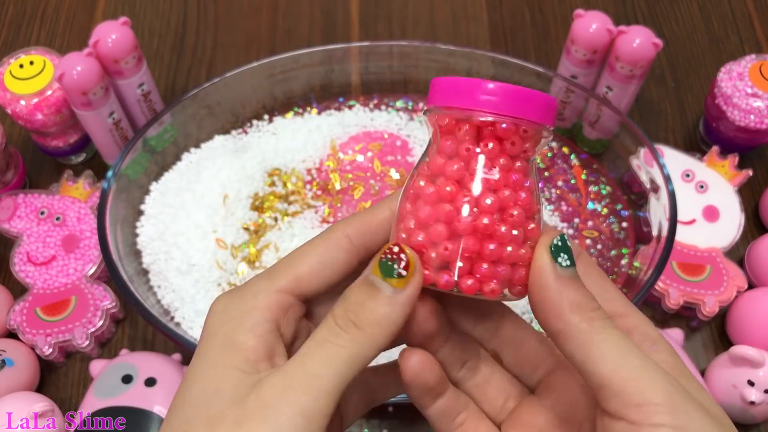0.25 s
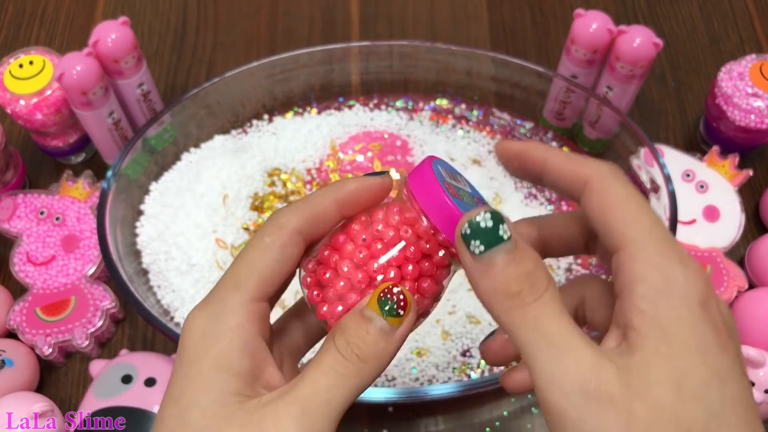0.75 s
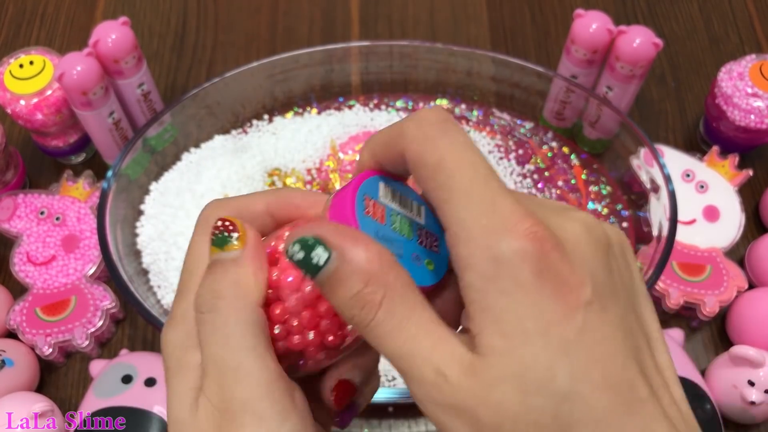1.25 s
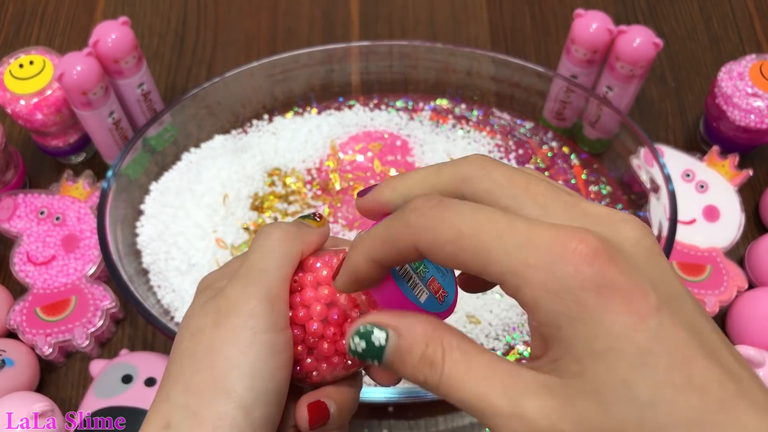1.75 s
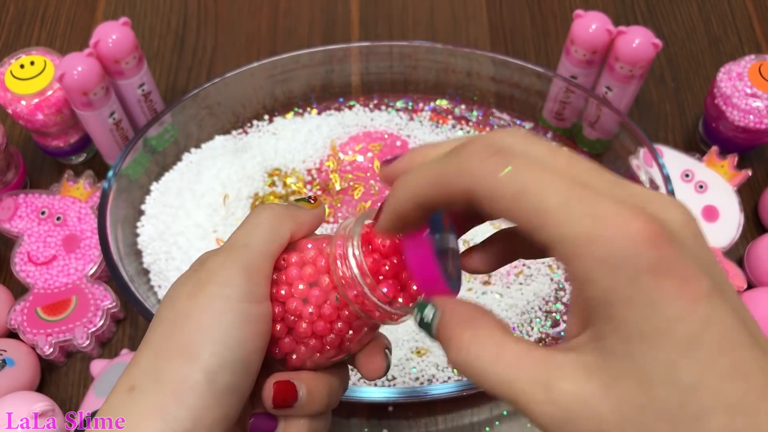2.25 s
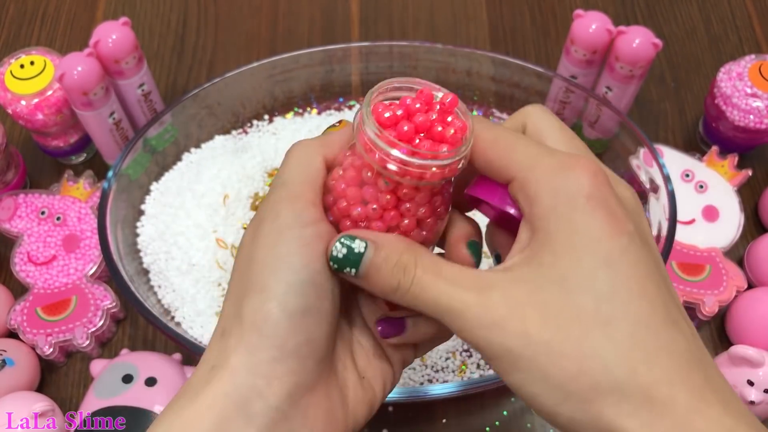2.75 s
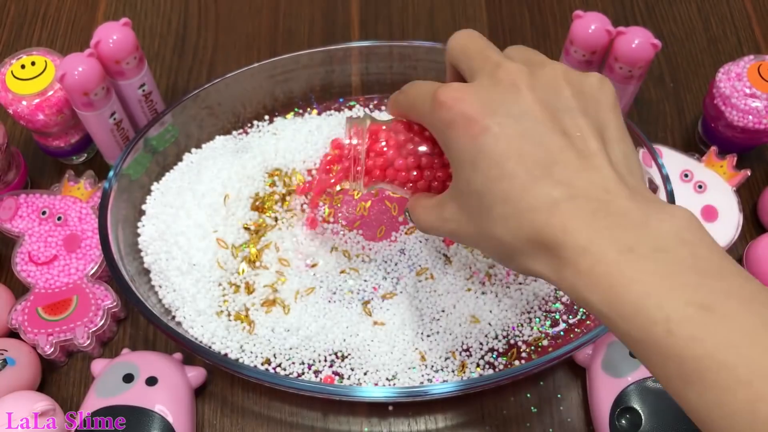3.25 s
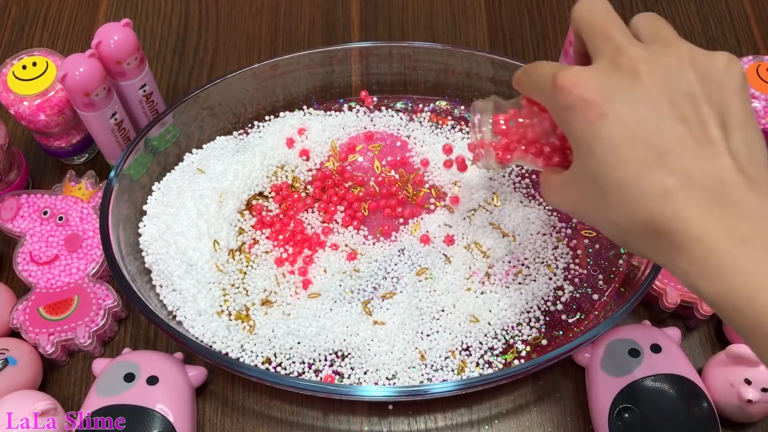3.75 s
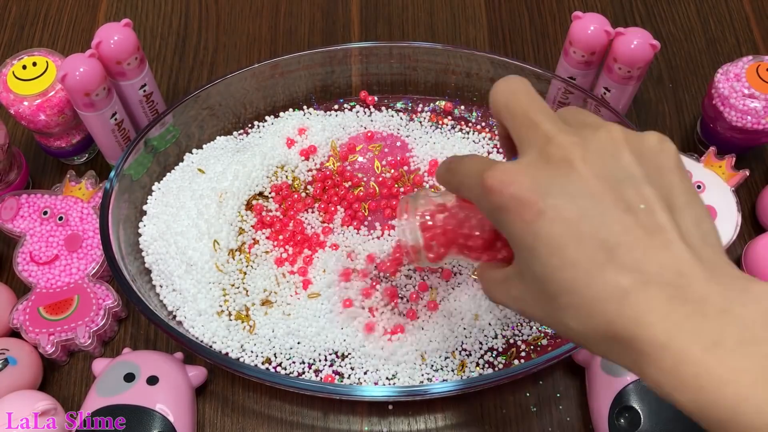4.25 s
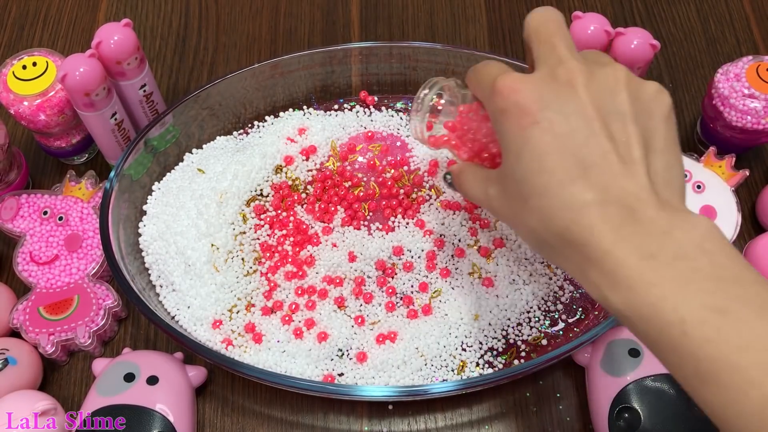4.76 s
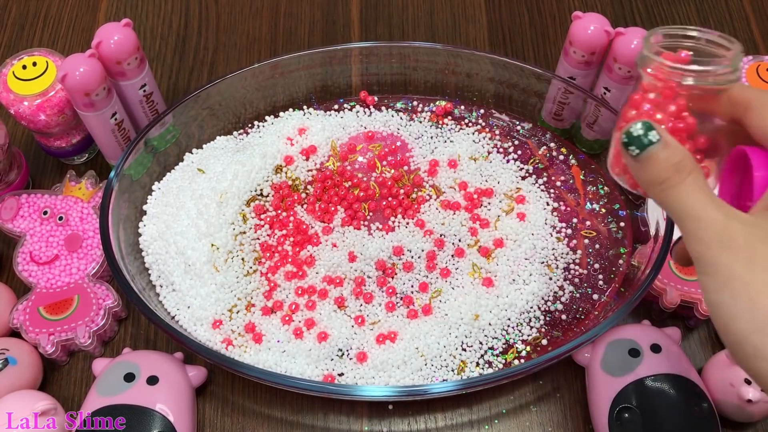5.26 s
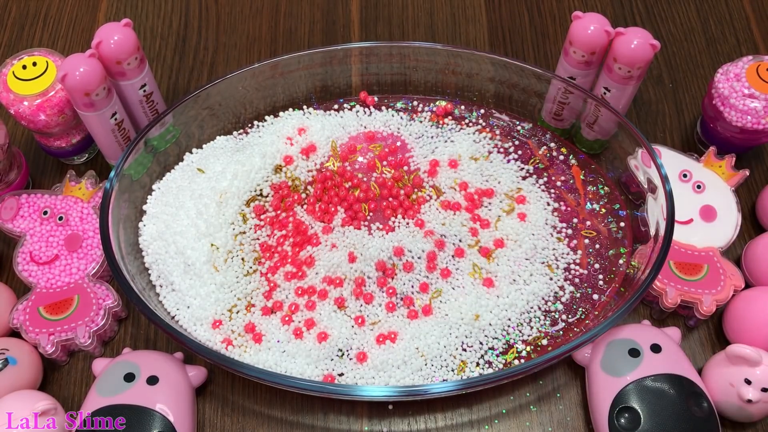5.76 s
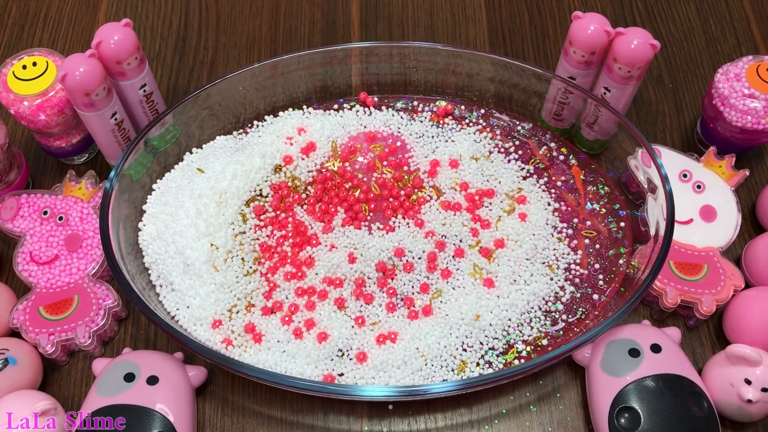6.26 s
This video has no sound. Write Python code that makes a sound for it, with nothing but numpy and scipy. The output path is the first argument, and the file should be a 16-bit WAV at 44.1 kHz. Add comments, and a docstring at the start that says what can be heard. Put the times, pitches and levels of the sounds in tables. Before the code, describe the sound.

Close, dry bead rattle in a hand-turned plastic jar, small lid clicks, a crisp ticking pour, a loud final clatter, then quiet hush.

```python
"""Hard beads rattle and slide in a small closed plastic jar turned by hand, close up in a quiet room.
The lid is unscrewed, beads pour into a glass bowl of foam balls, a few strays clink on the glass,
and the jar is stood up again so the rest tumbles back; twice the rattle stops short, the hush goes on.
Each bead knock is a click and a dying noise scatter through band-passes for wall, tick and air of the jar;
the lid is bursts of slip noise, the glass is decaying sines, hush and rumble are shaped noise."""
import sys
import numpy as np
from scipy import signal
from scipy.fft import rfft, irfft
from scipy.io import wavfile

SR = 44100
rng = np.random.default_rng(int(sys.argv[2]) if len(sys.argv) > 2 else 0)


def output_pcm(signal):
    """Save a mono or channel-first signal as 16-bit PCM at the path in sys.argv[1].

    Samples are clipped to [-1, 1] before scaling.
    """
    pcm = np.clip(np.atleast_2d(signal).T, -1, 1) * 32767
    wavfile.write(sys.argv[1], SR, np.round(pcm).astype(np.int16))


N = 287091
T = np.arange(N) / SR

# Room and microphone noise spectrum: f/Hz, relative density/dB
HUSH_SPECTRUM = [(20, -38), (35, -16.5), (55, -2), (82, -9.5), (200, -11), (500, -16.5), (900, -21),
                 (1200, -20), (5350, -31.5), (11600, -34), (14200, -32.5), (16000, -36.5)]
HUSH_DB = -65.5  # rms
# Soft low rumble that comes and goes: start/s, end/s, f/Hz, width/Hz, rms level/dB
RUMBLES = [(3.31, 5.063, 200, 300, -64.5), (5.445, 5.866, 170.3, 50, -71.5)]
ROOM_T60_S, ROOM_DB, ROOM_DULL_HZ = .55, -15.5, 8000  # decay, tail energy, treble roll-off

# Stray beads on the glass: t/s, strike level/dB, hardness/(dB per octave) that lifts the upper modes
GLASS_STRIKES = [(2.559, -44.5, 1.5), (2.6812, -48, 2), (2.7854, -53, 6)]
# Ringing modes of the glass: f/Hz, level/dB, t60/s
GLASS_MODES = [(1300, -5, 0.14), (2196, -5.5, 0.051), (3030, -11, 0.093), (5370, -19, .09),
               (6826, -21, 0.099), (8200, -17, 0.053)]

# Lid jerks along its thread and finger thumps on the jar:
# t/s, level at 620 Hz/dB, decay time/s, sharpness/(dB per octave)
LID_JERKS = [(1.515, -61, 0.074, 2), (1.614, -53.5, 0.022, 2.5), (1.639, -55, 0.031, -5),
             (1.969, -44, 0.0053, 2), (2.063, -53, 0.029, -0.5), (2.114, -56, 0.015, 6),
             (2.15, -58.5, 0.022, 5), (2.201, -47.5, 0.011, -0.5), (2.218, -50, .006, 4),
             (2.562, -57, 0.018, 0.5), (2.991, -52, 0.0077, 4)]
# Resonances of the lid and the hand-damped jar: f/Hz, width/Hz, level/dB
LID_MODES = [(341, 120, -2), (648, 275, 0), (1140, 590, 3.5), (2970, 480, -5.5)]

# Starts of the open-jar poses; before the first one the lid is on
LID_OFF_S, POURING_S, HALF_EMPTY_S, UPRIGHT_S, SETTLING_S = 2.48, 3.6, 4.1, 5.062, 5.4
POSES_S = [LID_OFF_S, POURING_S, HALF_EMPTY_S, UPRIGHT_S, SETTLING_S]
END_S = 5.861  # the last rattle stops short here

# Bead resonances: f/Hz, width/Hz, then relative level/dB in each of the six poses:
# lid on, tipping, pouring, half empty, upright, settling
# The plastic wall
WALL_MODES = [(3260, 500, 2.5, -9, -9, -12, -10.5, -5), (4020, 520, -1, -1, 0.5, -11, -1.5, 0),
              (4527, 220, -7.5, -8.5, 2.5, 0.5, -3, -1.5), (5044, 790, -0.5, -4, -3.5, 0, -7.5, -4),
              (6480, 1150, 0.5, -0.5, 3.5, 3.5, 0, -0.5)]
# The bright tick, same columns
TICK_MODES = [(7830, 1100, -1.5, -4, -5, -5.5, 4.5, 2.5), (9180, 590, 2, 0, 2, 0.5, -2, -2.5),
              (10060, 1200, 0, -2, -1.5, -0.5, -6.5, -14), (13470, 2000, -3.5, -5.5, -6, -6, -4.5, -15),
              (15570, 1800, 1.5, -3.5, -1.5, -1, -6.5, -6)]
# The air in the jar, same columns
AIR_MODES = [(810, 400, -30, -17, -17, -18.5, -37, -42.5), (1177.5, 140, -12, -4, -7.5, -1, -5, -14.5),
             (1363, 140, -10.5, -8, -10.5, -10, -2.5, 1), (1758, 460, -1, -2, -5.5, 1, 1, -4),
             (2127, 260, -7, -2, 0, -2, -2, -8), (2505, 690, 2.5, 0.5, -11, -9, -5, 2)]

# Single loud knocks: t/s, nominal wall peak level/dB, tick above wall/dB
LOUD_KNOCKS = [(0.0698, -34, 0.5), (0.084, -28.5, -6), (0.1389, -29.5, -13), (0.1593, -39, -4),
               (0.1778, -17, -13), (0.2274, -32, -9), (0.252, -30, -16), (0.2674, -36, -8),
               (0.439, -40.5, -8), (0.4627, -37.5, -7), (0.4775, -31, -21), (0.4977, -31.5, -15),
               (0.5315, -33, -23), (0.6018, -38, -6), (0.645, -30, 3), (0.6702, -27, 7), (0.7096, -34, -10),
               (0.7263, -35, 4.5), (0.7718, -25.5, -3), (0.786, -33, -5), (0.8345, -30.5, -2),
               (0.8494, -19.5, -5), (0.866, -27.5, -15), (0.8765, -35.5, 16), (0.9324, -27.5, -19),
               (0.9396, -27, -22), (0.967, -21, -9), (1.131, -33, -29), (1.217, -33.5, 0.5),
               (1.2985, -35, -18), (1.352, -48, 11), (1.5612, -42, -10), (1.6816, -25.5, 0.5),
               (1.6904, -27.5, -0.5), (1.9254, -35, -4), (1.971, -38, 8.5), (2.1154, -38, 4.5),
               (2.2491, -40.5, 17), (2.2591, -30.5, 6), (2.2829, -25, -5), (2.301, -28.5, -8),
               (2.3196, -25.5, -7), (2.3556, -35, 2), (2.38, -27.5, -0.5), (2.5566, -38.5, 12),
               (2.613, -41, 4), (2.6808, -40, 5), (2.7073, -36, 11.5), (2.73, -44, 11), (2.7767, -41.5, 2),
               (2.8244, -28, -9), (2.871, -33.5, 3), (2.8936, -34.5, 6), (2.9273, -28, 3),
               (2.9947, -29, -9), (3.009, -30.5, -1), (3.0282, -35.5, 10), (3.0403, -31, 3),
               (3.0864, -30.5, -3), (3.1508, -28.5, 6.5), (3.177, -32, 2.5), (3.2082, -26.5, 9),
               (3.223, -28, 9), (3.239, -22, 7), (3.2905, -28, 7), (3.3343, -25.5, 9), (3.5578, -23, 6.5),
               (3.668, -21.5, 9), (3.7254, -22.5, 9), (3.7499, -18.5, 8), (3.7753, -19, 5),
               (3.8046, -22, 9.5), (3.859, -22.5, 10.5), (3.9542, -21, 8.5), (4.0038, -25.5, 11),
               (4.0401, -22, 9.5), (4.0543, -23, 11), (4.1222, -22.5, 6), (4.1382, -17, 1.5),
               (4.1824, -15.5, 2), (4.2792, -22.5, 8), (4.445, -25, 10), (4.5615, -28, 8), (4.5988, -27, 3),
               (4.621, -28.5, 12), (4.6534, -39, 12.5), (4.703, -26, 10), (4.7105, -22.5, 1),
               (4.7322, -24.5, 10.5), (4.748, -30.5, 17.5), (4.7878, -27, 13.5), (4.8079, -19.5, -2.5),
               (4.8408, -25, -1), (4.861, -24.5, 2.5), (4.8944, -27.5, 8.5), (4.956, -44.5, 13.5),
               (4.9854, -50, 8), (5.1134, -45, -13), (5.139, -38.5, -1.5), (5.172, -41.5, -5),
               (5.1904, -29.5, -10), (5.224, -28, -8), (5.2432, -24.5, -8.5), (5.257, -21, -6.5),
               (5.2867, -29, -3), (5.3231, -12, -9), (5.3336, -7.5, -5), (5.3476, -13, 2.5),
               (5.3581, -14, -1.5), (5.3933, -17.5, -1), (5.4322, -11, -3.5), (5.4963, -13.5, -5),
               (5.5222, -18.5, -12), (5.5608, -21, -8), (5.5914, -21, -13), (5.625, -33.5, -14.5),
               (5.6875, -20, -4.5), (5.7343, -16.5, -1.5), (5.7526, -18.5, 0.5), (5.7738, -24, -4),
               (5.827, -30.5, -14)]
# Beads slide over in the jar before the pour: start/s, hold/s, wall level/dB, tick above wall/dB
SLIDES = [(0.0, 0.068, -50, -3.5), (0.149, 0.028, -32.5, -10), (0.22, 0.028, -40.5, -8.5),
          (0.603, .04, -47, -11), (0.643, 0.1, -47.5, -4), (.955, 0.015, -45, -10),
          (1.119, 0.037, -55.5, -12.5), (1.28, 0.048, -51.5, -8), (1.502, 0.07, -57.5, -3.5),
          (1.59, 0.037, -51.5, -1), (1.663, 0.022, -52, -3), (1.95, 0.024, -56.5, -6),
          (2.054, 0.073, -50.5, -1.5), (2.197, 0.094, -53.5, -3), (2.548, 0.016, -61, 3)]
# Beads on the move in the open jar, out of it and back down: t/s, wall level/dB
FLOW = [(2.85, -80), (2.88, -53), (3.09, -57), (3.24, -45), (3.31, -46), (3.35, -42), (3.65, -36.5),
        (3.9, -42), (4.14, -44), (4.19, -38.5), (4.3, -35.5), (4.43, -39.5), (4.5, -44), (4.665, -55.5),
        (4.72, -50.5), (4.92, -57), (5.1, -70.5), (5.21, -51), (5.25, -37), (5.34, -31), (5.45, -34.5),
        (5.66, -53), (5.75, -44), (5.86, -54.5)]
# Click gain in each of the six poses, bare walls clack hardest: level/dB
CLICK_DB = [6.7, 6.5, 3.2, 4.5, 6.9, 8.6]
# Tick of the small knocks above their wall level, before the flow brightens it, per pose: level/dB
CROWD_TICK_DB = [-8, 4.5, 4, 5.5, -8, -6]
# Air of the small knocks above their wall level, per pose: level/dB
CROWD_AIR_DB = [-10.5, -8, -5.5, -3, -0.5, 0]
# Air of a loud knock above its wall level, per pose: level/dB
KNOCK_AIR_DB = [-11, -7, -11, -7, -1.5, -0.5]

SMALL_KNOCKS_PER_S, SIZE_SPREAD_DB, LARGEST_DB = 450, 2, 12
COLOUR_SPREAD_DB = 4.5  # how unevenly a small knock strikes the modes
CREST_DB = 6.5  # peak of a loud knock above its driving level
RESTING_DB = -66  # wall level of resting beads
SLIDE_RISE_S, SLIDE_FALL_S = 0.0089, 0.0056
SLIDE_TAIL_DB, SLIDE_TAIL_S = -14, 0.052  # stragglers after a slide: level below it, decay
TICK_PER_FLOW, FULL_FLOW_DB = 0.26, -40  # a stronger flow ticks brighter (dB per dB)
TOP_HZ = 15720


def undb(db):
    """Amplitude gain of a dB value."""
    return 10 ** (np.asarray(db) / 20)


def power_undb(db):
    """Power gain of a dB value."""
    return undb(2 * np.asarray(db))


def unit(x):
    """Scale to rms 1."""
    return x / np.sqrt(np.mean(x ** 2))


def fade(x, tau_s):
    """Turn every spike into an exponential decay."""
    return signal.lfilter([1], [1, -np.exp(-1 / (tau_s * SR))], x)


def resonance(x, hz, width_hz, order=2):
    """Band-pass, quick (order 1) or steep (order 2), with make-up gain so white noise about keeps its rms."""
    edges = [max(hz - width_hz / 2, 20), min(hz + width_hz / 2, .45 * SR)]
    band = signal.butter(order, edges, "bandpass", fs=SR, output="sos")
    return signal.sosfilt(band, x) * np.sqrt(SR / 2 / width_hz)


def spikes(s, size):
    """Place a spike of the given size at each time."""
    return np.bincount((np.asarray(s) * SR).astype(int), size, N)[:N]


def hush():
    """Steady room and microphone noise: white noise coloured in the spectrum."""
    hz, db = np.transpose(HUSH_SPECTRUM)
    f = np.fft.rfftfreq(N, 1 / SR)
    colour = undb(np.interp(np.log(f + 1), np.log(hz), db))
    noise = irfft(rfft(rng.standard_normal(N)) * colour, N)
    return unit(noise) * undb(HUSH_DB)


def rumble():
    """Band-passed low noise, eased in and stopped dead."""
    out = np.zeros(N)
    for start, end, hz, width_hz, db in RUMBLES:
        noise = resonance(rng.standard_normal(N), hz, width_hz)
        swell = np.clip((T - start) / 0.022, 0, 1) * (T < end)
        out += undb(db) * noise * swell
    return out


def room(x):
    """A short dull tail from table and walls: convolution with decaying noise."""
    t = T[:SR // 2]
    tail = rng.standard_normal(len(t)) * 1000 ** (-t / ROOM_T60_S) * (t > .004)
    tail = signal.lfilter(*signal.butter(1, ROOM_DULL_HZ, fs=SR), tail)
    tail /= np.sqrt(np.sum(tail ** 2))
    return undb(ROOM_DB) * signal.fftconvolve(x, tail)[:N]


def glass():
    """The same few modes ring after each strike; a harder one wakes the upper modes more."""
    out = np.zeros(N)
    t = T[:SR // 2]
    lowest_hz = GLASS_MODES[0][0]
    for s, db, hard_db in GLASS_STRIKES:
        ring = np.zeros(len(t))
        for hz, mode_db, t60 in GLASS_MODES:
            gain = undb(mode_db + hard_db * np.log2(hz / lowest_hz))
            ring += gain * np.sin(2 * np.pi * hz * t) * 1000 ** (-t / t60)
        i = int(s * SR)
        out[i:i + len(t)] += undb(db) * ring
    return out


def lid():
    """Each jerk or thump is a dying run of small slips that rings the lid and the hand-damped jar."""
    slip_sizes = undb(1.6 * rng.exponential(size=8000))
    slips = spikes(rng.uniform(0, N / SR, size=8000), slip_sizes)
    drag = unit(fade(slips, 0.002) * rng.standard_normal(N))
    out = np.zeros(N)
    for hz, width_hz, mode_db in LID_MODES:
        octaves = np.log2(hz / 620)
        grip = np.zeros(N)
        for s, db, drag_s, sharp_db in LID_JERKS:
            decay = np.exp(-np.maximum(T - s, 0) / drag_s) * (T > s)
            grip += undb(db + sharp_db * octaves) * decay
        out += undb(mode_db) * resonance(drag * grip, hz, width_hz)
    return out


def stir(pose):
    """Power of the small knocks on wall, tick and air: resting beads, slides that rise, hold and die, the flow."""
    flow_db = np.interp(T, *np.transpose(FLOW))
    wall = np.where(T < FLOW[0][0], power_undb(RESTING_DB), power_undb(flow_db))
    brighter_db = TICK_PER_FLOW * (flow_db - FULL_FLOW_DB) * (T > FLOW[1][0])
    tick = wall * power_undb(CROWD_TICK_DB)[pose] * power_undb(brighter_db)
    for s, hold_s, db, tick_db in SLIDES:
        rise = np.clip((T - s) / SLIDE_RISE_S, 0, 1) ** 2
        after = np.maximum(T - s - hold_s, 0)
        stragglers = power_undb(SLIDE_TAIL_DB) * np.exp(-after / SLIDE_TAIL_S)
        fall = np.exp(-after / SLIDE_FALL_S) + stragglers
        slide = power_undb(db) * rise * fall
        wall = wall + slide
        tick = tick + slide * power_undb(tick_db)
    air = wall * power_undb(CROWD_AIR_DB)[pose]
    return np.array([wall, tick, air])


def scatter(power):
    """Power of the quick and slow dying scatter off nearby beads after each knock."""
    return power_undb(-2.5) * fade(power, .0006) + power_undb(-10.75) * fade(power, 0.0026)


def beads():
    """Every knock is a hard click, then a dying scatter; each strikes the modes differently."""
    pose = np.searchsorted(POSES_S, T)
    loud_s, wall_db, tick_db = np.transpose(LOUD_KNOCKS)
    air_db = np.take(KNOCK_AIR_DB, np.searchsorted(POSES_S, loud_s))
    loud_db = [wall_db, wall_db + tick_db, wall_db + air_db]

    count = int(SMALL_KNOCKS_PER_S * N / SR)
    small_s = rng.uniform(0, N / SR, count)
    size_db = np.minimum(SIZE_SPREAD_DB * rng.exponential(size=count), LARGEST_DB)
    crowds = stir(pose)

    push = rng.choice([-1., 1.], N)  # a click drives all modes the same way
    click = undb(CLICK_DB)[pose]
    one_knock = np.r_[1, np.zeros(SR // 10)]
    knock_energy = click ** 2 + np.sum(scatter(one_knock))

    out = np.zeros(N)
    parts = zip((WALL_MODES, TICK_MODES, AIR_MODES), (1, 1, 2), crowds, loud_db)
    for modes, order, level, peak_db in parts:
        modes = np.array(modes, float)
        mode_db = modes[:, 2:]
        share = undb(mode_db) / np.sqrt(np.sum(power_undb(mode_db), axis=0))  # total power 1 per pose
        crowd = level / knock_energy
        for (hz, width_hz), by_pose in zip(modes[:, :2], share):
            colour_db = COLOUR_SPREAD_DB * rng.standard_normal(count)
            small = spikes(small_s, power_undb(size_db + colour_db))
            own_db = 1.3 * rng.standard_normal(len(loud_s))  # each loud knock's own colour
            loud = spikes(loud_s, power_undb(peak_db + own_db - CREST_DB))
            power = small / small.mean() * crowd + loud
            clicks = click * push * np.sqrt(power)
            scattered = np.sqrt(scatter(power)) * rng.standard_normal(N)
            force = clicks + scattered
            out += resonance(by_pose[pose] * force, hz, width_hz, order=order)
    return out


def scene():
    """Beads, lid and glass play in two stretches, each stopped short with its room tail over a steady hush."""
    near = beads() + lid() + glass()
    out = hush() + rumble()
    for start, end in ((0, UPRIGHT_S), (UPRIGHT_S, END_S)):
        stretch = near * (T >= start)
        stop = np.clip((end - T) / 0.0016, 0, 1)
        out += (stretch + room(stretch)) * stop
    return out[None]


def record(dry):
    """A steep elliptic low-pass takes off the top of the treble."""
    return signal.sosfilt(signal.ellip(10, .2, 70, TOP_HZ, fs=SR, output="sos"), dry)


dry = scene()
out = record(dry)
output_pcm(out)
```